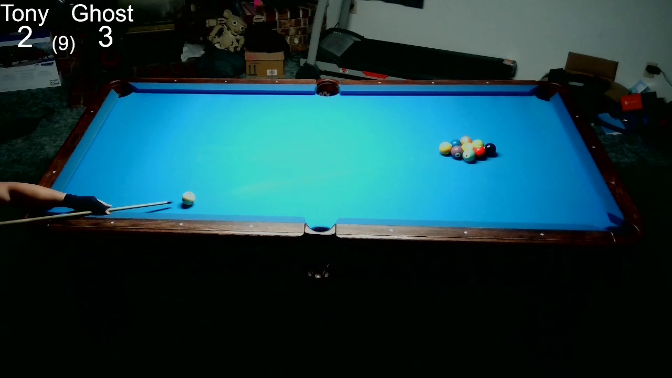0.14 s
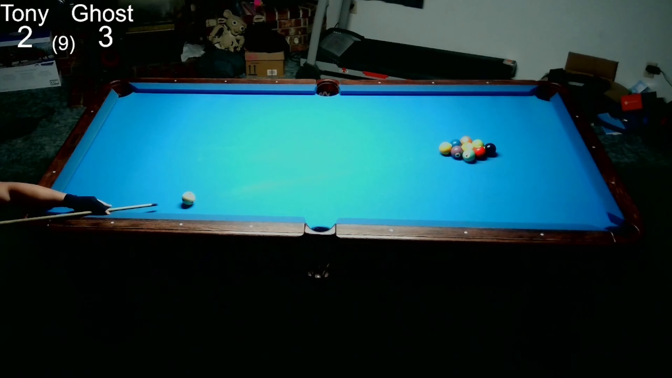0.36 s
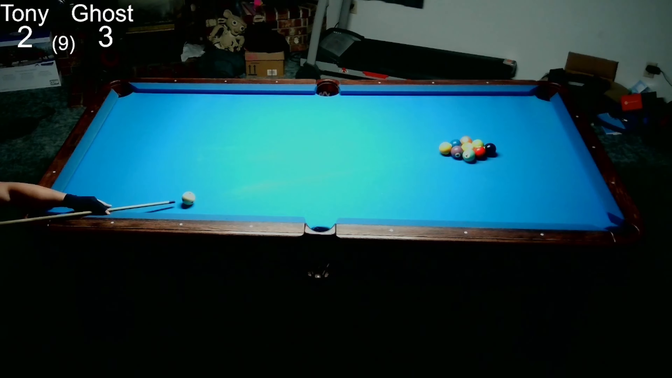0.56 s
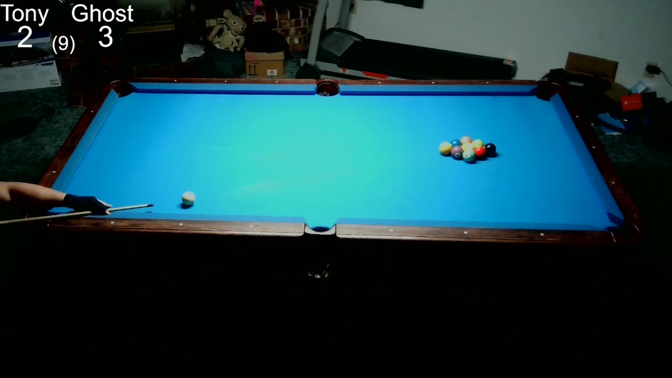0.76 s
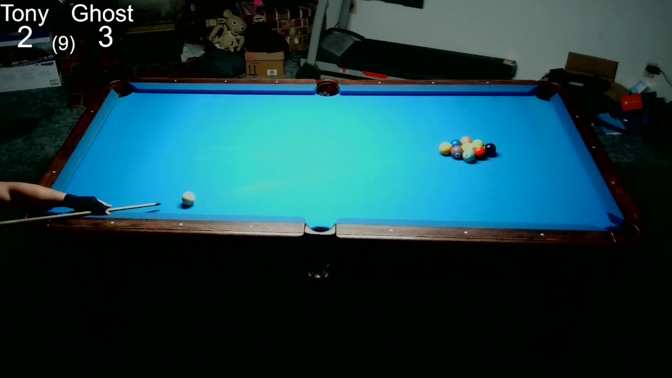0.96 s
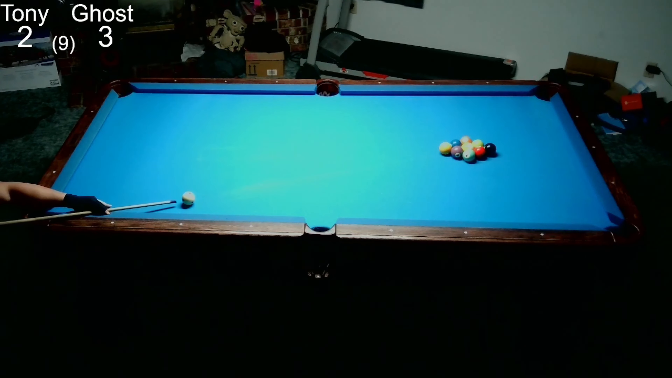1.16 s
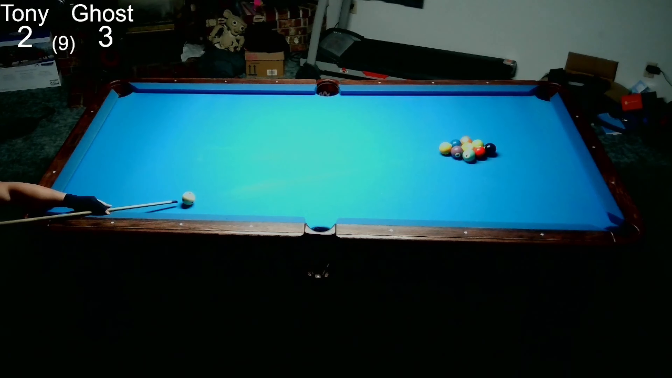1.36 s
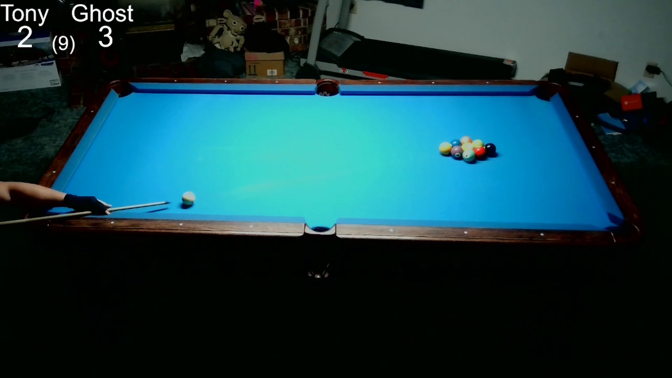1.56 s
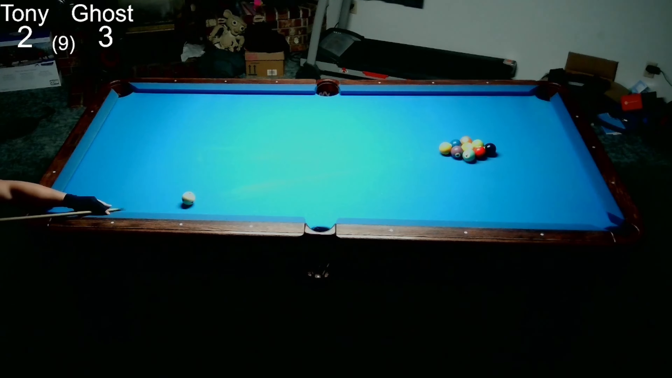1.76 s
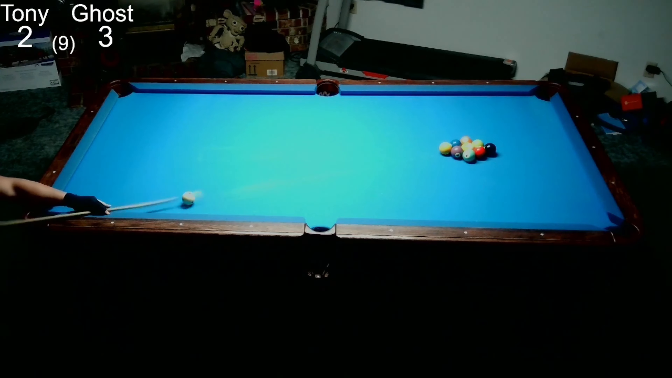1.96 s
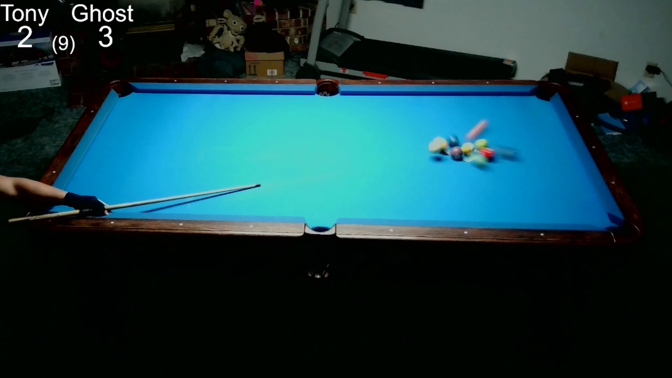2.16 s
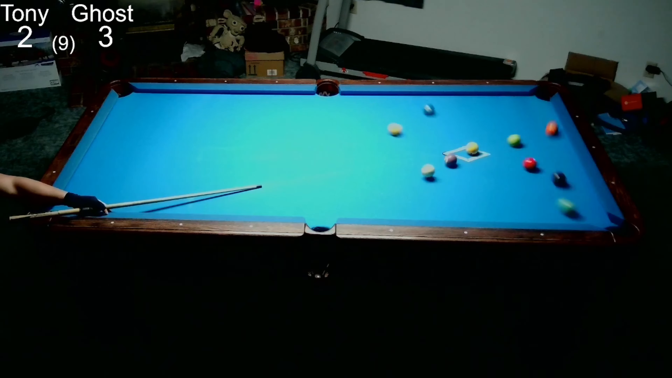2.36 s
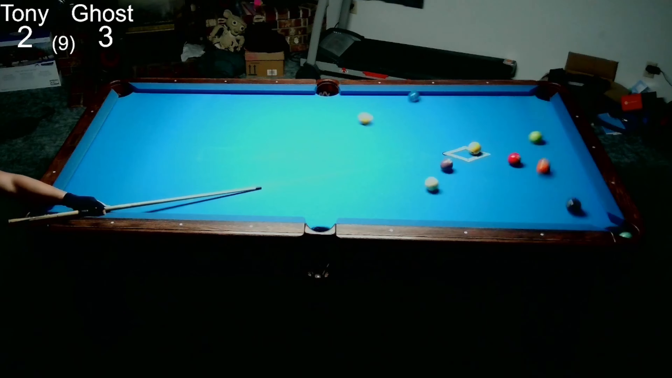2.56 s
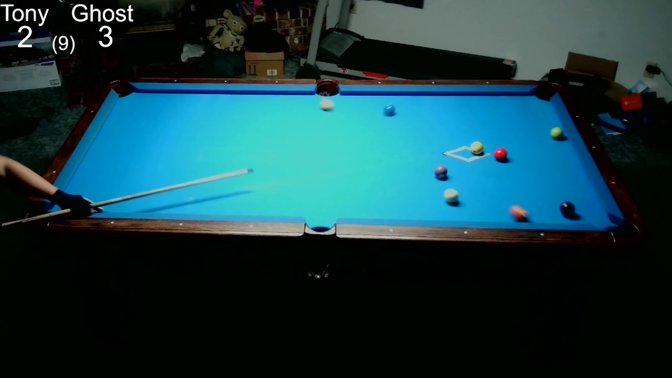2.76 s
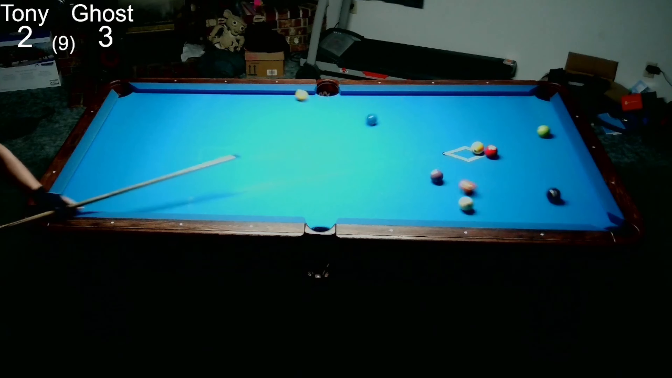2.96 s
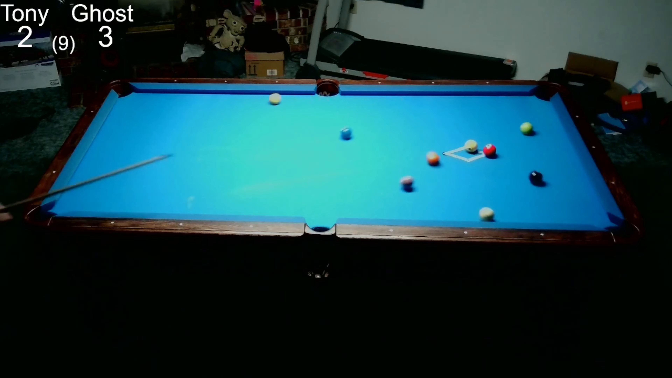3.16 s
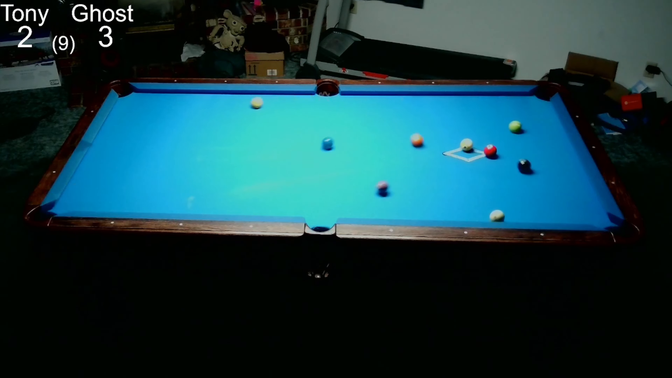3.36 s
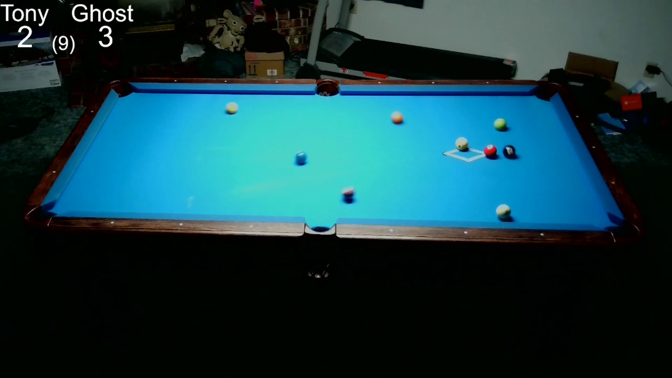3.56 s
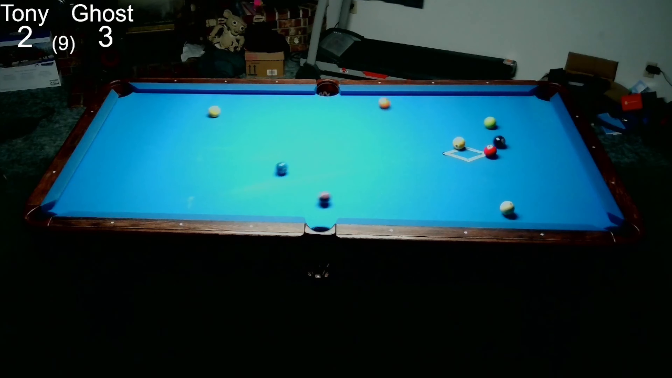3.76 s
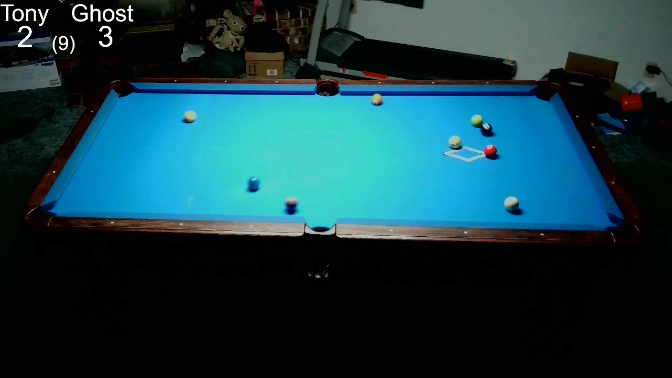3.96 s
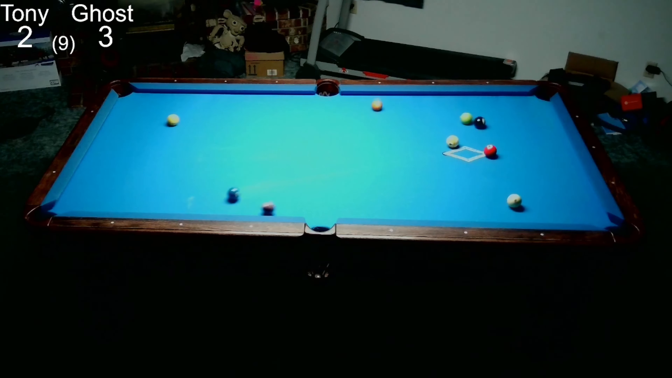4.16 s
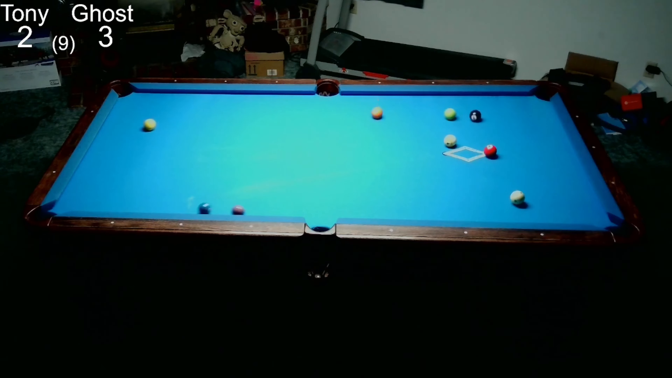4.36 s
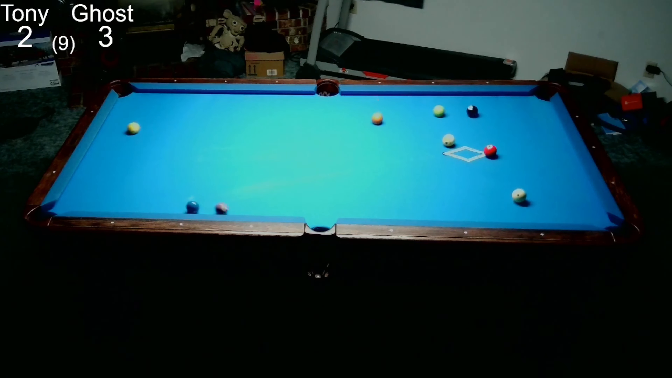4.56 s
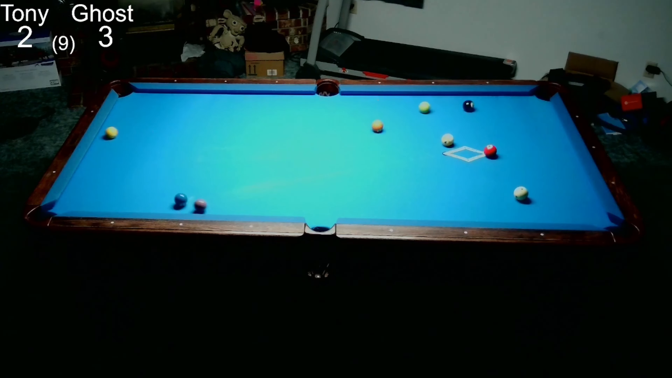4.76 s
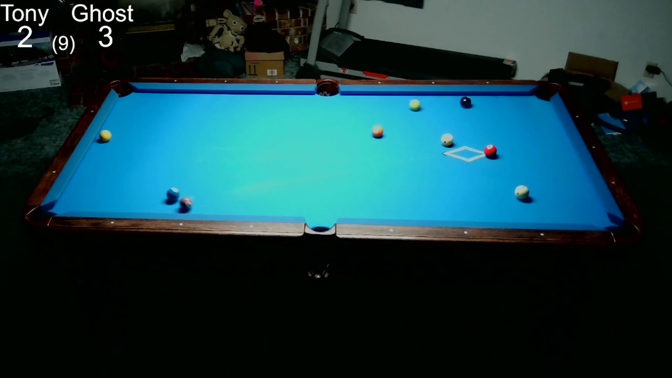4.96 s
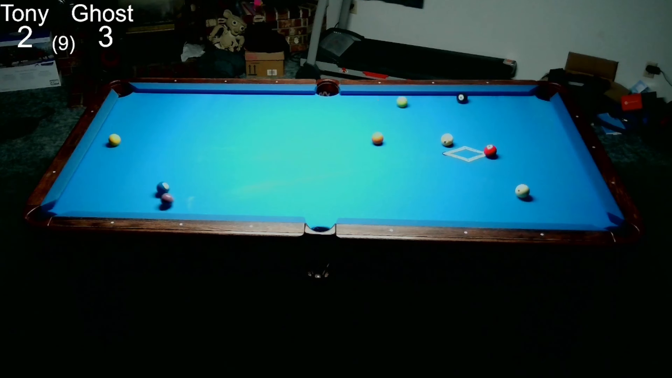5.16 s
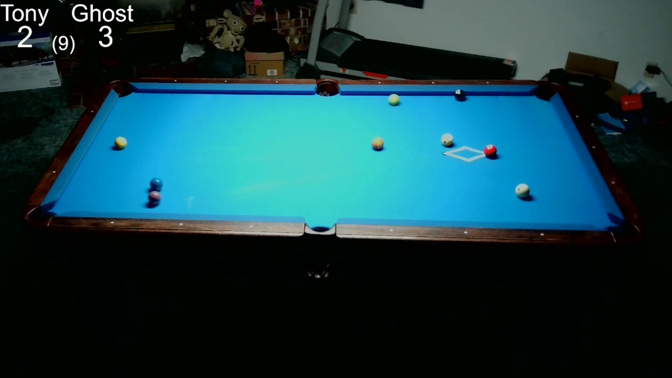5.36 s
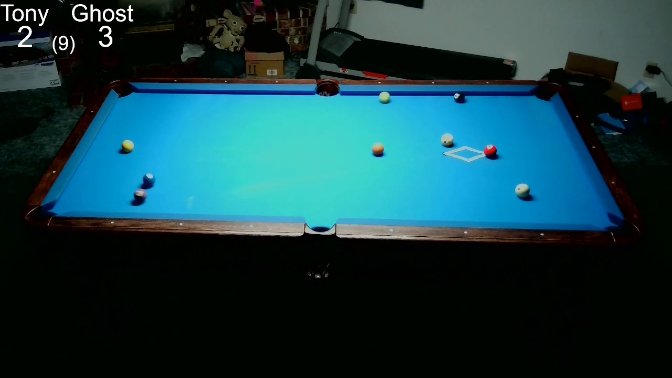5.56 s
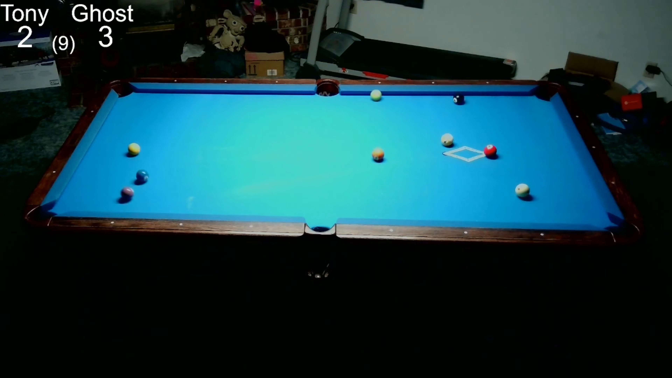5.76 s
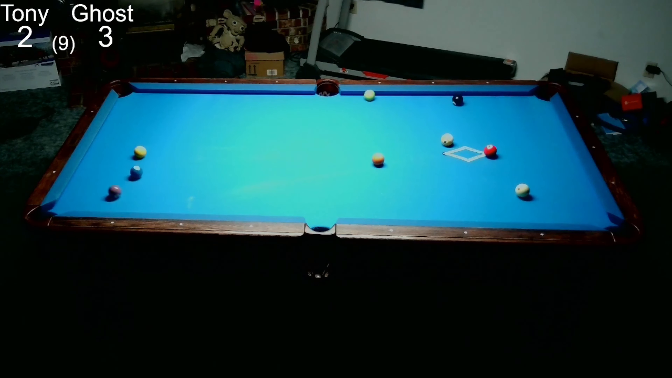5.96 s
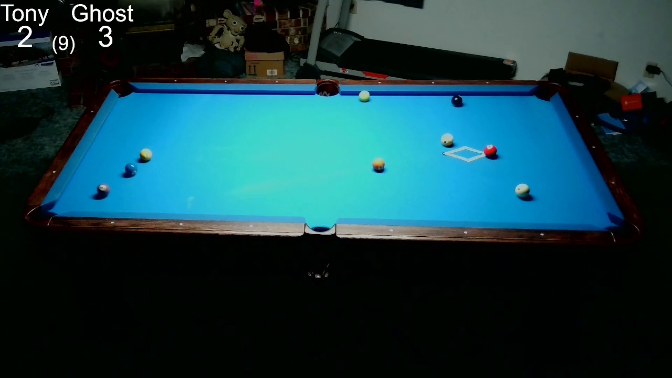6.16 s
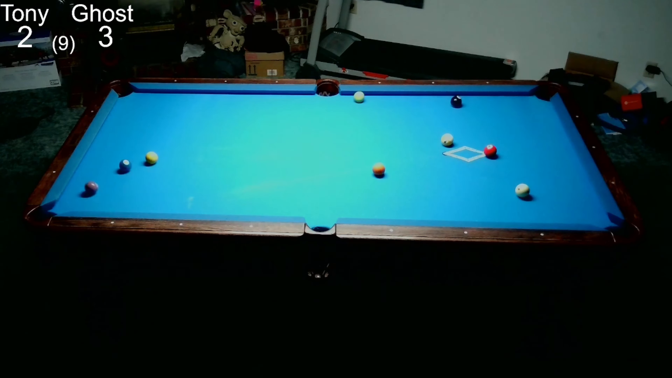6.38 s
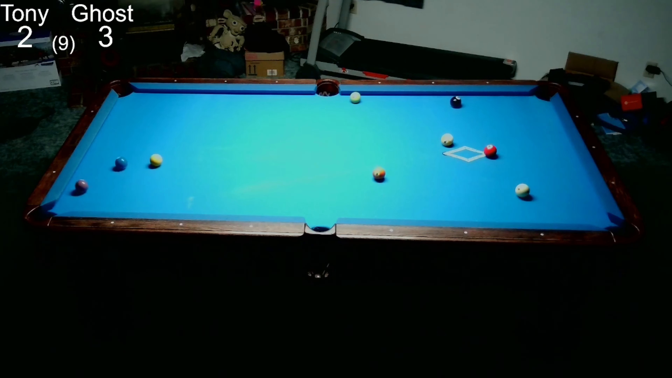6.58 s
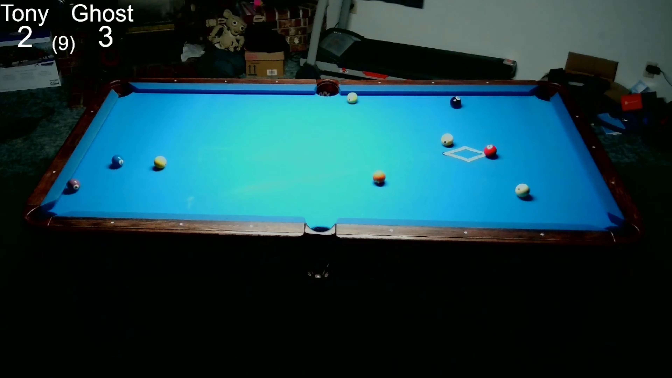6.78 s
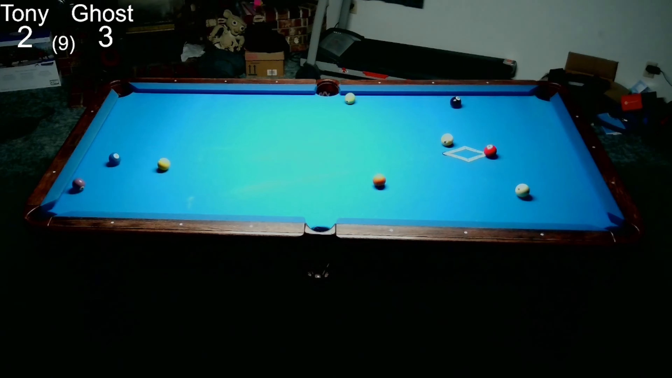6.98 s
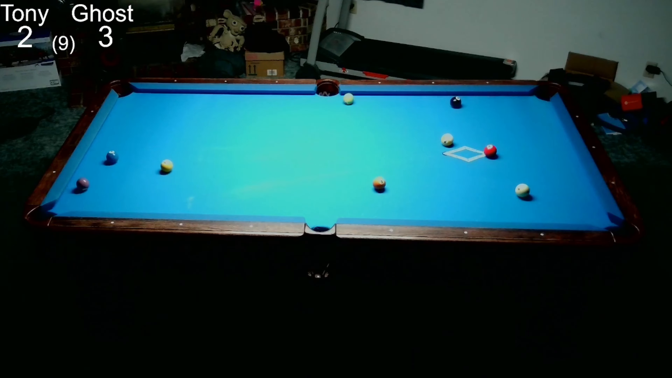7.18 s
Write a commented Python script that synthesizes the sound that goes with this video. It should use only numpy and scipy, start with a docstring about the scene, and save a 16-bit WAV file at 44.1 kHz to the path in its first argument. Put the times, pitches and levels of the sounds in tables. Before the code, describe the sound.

A steady low hum fills a quiet, small room until a pool break cuts in: a sharp cue strike, then a very loud crack of packed balls that briefly overloads the microphone. Dull cushion thumps and a few sharp ball clicks die away over faint rolling. Later come only scattered soft taps, a quiet knock of wood and some tiny clinks.

```python
"""Pool break in a small room.

Over mains hum and hiss, a cue cracks against the white ball, which bursts the rack hard enough
to overload the microphone. Balls thump into the rubber cushions, roll on the slate and click
together. Later come light taps, a wooden knock away from the balls and a few small clinks."""
import sys
import numpy as np
from scipy import signal
from scipy.fft import rfft, irfft
from scipy.io import wavfile

SR = 44100
rng = np.random.default_rng(int(sys.argv[2]) if len(sys.argv) > 2 else 0)


def dump(signal):
    """Clip the signal to [-1, 1] and save it as 16-bit WAV at the path in sys.argv[1]."""
    limited = np.clip(np.atleast_2d(signal).T, -1, 1)
    pcm = np.round(limited * 32767).astype(np.int16)
    wavfile.write(sys.argv[1], SR, pcm)


N = 318574
TIME_S = np.arange(N) / SR
BREAK_S = 2.0035


def from_db(db):
    """Decibels to gain."""
    return 10 ** (np.asarray(db) / 20)


def at_hz(points, hz):
    """Table lookup on a log-frequency axis."""
    points_hz, values = np.transpose(points)
    return np.interp(np.log(np.maximum(hz, 1)), np.log(points_hz), values)


def add(track, start_s, sound):
    """Mix sound into track at start_s."""
    start = round(start_s * SR)
    track[start:start + len(sound)] += sound[:N - start]


def butter(x, hz, kind, order=2):
    """Causal Butterworth filter."""
    sos = signal.butter(order, np.clip(hz, 10, .45 * SR), kind, fs=SR, output="sos")
    return signal.sosfilt(sos, x)


def noise(spectrum, size):
    """Coloured noise, rms 1."""
    gain = from_db(at_hz(spectrum, np.fft.rfftfreq(size, 1 / SR)))
    x = irfft(rfft(rng.standard_normal(size)) * gain, size)
    return x / x.std()


def fade(t60_s, size):
    """Exponential decay from 1."""
    return np.exp(-np.log(1000) * TIME_S[:size] / t60_s)


def ring(modes, size):
    """Damped sines of a struck body."""
    return sum(from_db(db) * fade(t60_s, size) * np.sin(2 * np.pi * hz * TIME_S[:size])
               for hz, db, t60_s in modes)


def rattle(low_hz, high_hz, t60_s, size):
    """Band-limited noise burst of a light contact."""
    burst = rng.standard_normal(size) * fade(t60_s, size)
    return 2 * butter(butter(burst, low_hz, "high"), high_hz, "low", order=4)


def background(mains_hz=60, hiss_db=-66.5, rumble_db=-67, rumble_hz=60):
    """Mains hum over faint room hiss and rumble."""
    # mains partials: harmonic number, rms level/dB
    harmonics = [(1, -48.5), (2, -74.5), (3, -85.5), (5, -87), (7, -83), (9, -85), (11, -83)]
    # room hiss: f/Hz, relative density/dB
    hiss_spectrum = [(100, -6), (160, -8.5), (260, -8), (400, -11.5), (700, -13), (1400, -17.5),
                     (3000, -21.5), (5200, -23.5), (8000, -28), (15500, -29)]
    hum = sum(np.sqrt(2) * from_db(db) * np.sin(2 * np.pi * (round(k) * mains_hz * TIME_S + rng.random()))
              for k, db in harmonics)
    rumble = butter(rng.standard_normal(N), rumble_hz, "low")
    return hum + from_db(hiss_db) * noise(hiss_spectrum, N) + from_db(rumble_db) * rumble / rumble.std()


def cue(crack_db=-10, crack_t60_s=.016, tip_hz=10000, ring_db=2, grip_t60_s=.12,
        gap_s=.0022, gap_growth=2.6, loss_db=3, contacts=3, size=16384):
    """The tip chatters; each contact cracks and rings the shaft, which the hand damps."""
    # blow and rebound: t/s, level/dB
    hits = [(1.8687, -2), (1.9239, -14)]
    # shaft and tip modes: f/Hz, level/dB, t60/s
    modes = [(970, -24.5, 0.015), (1152, -27, .04), (1686.5, -28.5, 0.022), (2546, -21.5, 0.04),
             (2910, -14.5, 0.044), (2896, -15.5, 0.081), (3550, -18, .025), (3570, -12.5, 0.014),
             (3750, -16, 0.061), (3754, -14.5, 0.019), (4380, -17, 0.044), (4580, -17.5, .06),
             (5567, -23.5, 0.068), (5618, -24, .10), (5550, -25, 0.055), (6100, -26, 0.018)]
    # tip crack: f/Hz, relative density/dB
    crack_spectrum = [(150, -15.5), (300, -11.5), (550, -7), (1000, -1), (2000, -5.5), (3600, 3),
                      (5800, -1), (7500, -10.5), (10500, -12), (12000, -22), (15500, -23.5)]
    out, grip = np.zeros(N), fade(grip_t60_s, size)
    for t_s, db in hits:
        for k in range(contacts):
            crack = butter(noise(crack_spectrum, size) * fade(crack_t60_s, size), tip_hz, "low", order=1)
            add(out, t_s, from_db(db + crack_db) * crack)
            for mode in modes:
                jitter_s = rng.random() / mode[0]
                partial = rng.choice([-1, 1]) * ring([mode], size) * grip
                add(out, t_s + jitter_s, from_db(db + ring_db) * partial)
            t_s += gap_s * gap_growth ** k
            db -= loss_db
    return butter(out, 110, "high")  # the stroke carries little bass


def cushions(full_db=-22, full_top_hz=1360, settle_s=.009, settle_db=-.5,
             rise_s=.004, rail_t60_s=.085, frame_db=-3.5, size=32768):
    """A ball hits rubber, then settles with a second bump; the rail dies fast, the frame rings on."""
    # balls on cushions and slate: t/s, level/dB
    thumps = [(1.8690, -32), (1.9620, -37), (2.0050, -35), (2.1290, -25.5), (2.2397, -22), (2.3090, -36.5),
              (2.3590, -30), (2.4220, -37.5), (2.5320, -40), (2.7070, -43)]
    # rubber and rail: f/Hz, relative density/dB
    rail_spectrum = [(50, -24.5), (120, -7.5), (220, -1.5), (350, -0.5), (550, -2), (800, -3.5),
                     (1200, -1.5), (3000, -2)]
    # table frame modes: f/Hz, level/dB, t60/s
    frame_modes = [(141, -30.5, .4), (205.73, -22.5, 2.2), (274, -21.5, 0.299)]
    out = np.zeros(N)
    frame = from_db(frame_db) * ring(frame_modes, size)
    attack = 1 - np.exp(-TIME_S[:size] / rise_s)
    for t_s, db in thumps:
        drop_db = full_db - db  # slower balls sound duller and settle later
        top_hz = full_top_hz / 2 ** (drop_db / 42)
        wait_s = settle_s * 2 ** (drop_db / 12)
        for start_s, bump_db in ((t_s, db), (t_s + wait_s, db + settle_db)):
            rail = butter(noise(rail_spectrum, size), top_hz, "low", order=4)
            thump = rail / rail.std() * fade(rail_t60_s, size) + frame
            add(out, start_s, from_db(bump_db) * thump * attack)
    return out


def clack(contact_ms, radiate_hz=1400, snap_db=-45, fizz_db=-40, size=1024):
    """Two balls collide and radiate the slope of the contact force, plus faint snap and fizz."""
    phase = np.pi * np.minimum(TIME_S[:size] * 1000 / contact_ms, 1)
    force = np.sin(phase).clip(0) ** 1.5
    pulse = butter(np.diff(force, prepend=0), radiate_hz, "high", order=1)
    pulse = butter(pulse, 670, "high")  # a small sphere radiates long waves poorly
    pulse = butter(pulse, 1300 / contact_ms, "low", order=4)  # longer contact, duller sound
    snap = from_db(snap_db) * rng.standard_normal(size) * fade(.003, size)
    fizz = from_db(fizz_db) * rattle(low_hz=13500, high_hz=15000, t60_s=.004, size=size)
    return pulse / np.abs(pulse).max() + snap + fizz


def front_row(first_db=12, loss_db=1, first_ms=.33, lengthening=1.03, contacts=4):
    """The first balls pass the blow on, back to back, each contact weaker and longer."""
    out, t_s = np.zeros(N), BREAK_S
    for k in range(contacts):
        contact_ms = first_ms * lengthening ** k
        add(out, t_s, from_db(first_db - k * loss_db) * clack(contact_ms))
        t_s += contact_ms / 1000
    return out


def rack(chain_db=3.5, fall_db=8, spread_s=.008, hard_ms=.29, soft_ms=.41,
         clatter_db=-1, clatter_t60_s=.02, contacts=10, size=8192):
    """The blow weakens through the packed balls; the smallest contacts merge into clatter."""
    # rack clatter: f/Hz, relative density/dB
    clatter_spectrum = [(80, -40), (250, -27), (700, -17.5), (1150, 3), (1500, -6), (2200, -3), (3000, 4.5),
                        (4200, -9), (5600, -19.5), (7000, -29.5), (9000, -43), (15000, -50.5)]
    out = np.zeros(N)
    for depth in (np.arange(contacts) + rng.random(contacts)) / contacts:
        contact = clack(hard_ms + depth * (soft_ms - hard_ms)) * rng.choice([-1, 1])
        add(out, BREAK_S + depth * spread_s, from_db(chain_db - depth * fall_db) * contact)
    add(out, BREAK_S, from_db(clatter_db) * noise(clatter_spectrum, size) * fade(clatter_t60_s, size))
    return out


def rolling(slate_hz=262, width_hz=45, level_db=-73, fall_db_per_s=.02):
    """From the break on, rolling balls excite one low slate band at near-constant level."""
    band_hz = [slate_hz - width_hz / 2, slate_hz + width_hz / 2]
    murmur = butter(rng.standard_normal(N), band_hz, "band", order=1)
    age_s = TIME_S - BREAK_S
    return (age_s > 0) * from_db(level_db - fall_db_per_s * age_s) * murmur / murmur.std()


def collisions():
    """Spreading balls click together."""
    # ball on ball: t/s, level/dB, contact time/ms
    hits = [(2.2155, -9.5, 0.37), (2.8521, -33.5, 0.456), (2.9022, -19, 0.4), (3.9640, -40, 0.477)]
    out = np.zeros(N)
    for t_s, db, contact_ms in hits:
        add(out, t_s, from_db(db) * clack(contact_ms))
    return out


def taps(width_octaves=1.33, size=8192):
    """Light contacts: noise bursts, each around its own pitch."""
    # taps: t/s, level/dB, centre f/Hz, t60/s
    hits = [(2.418, -43, 2880, 0.04), (2.4634, -42, 2460, 0.025), (2.6826, -48.5, 2257, 0.089),
            (2.7073, -52.5, 2710, 0.172), (4.2307, -42.5, 3100, .007), (5.475, -55.5, 2900, 0.056),
            (5.8180, -52.5, 4300, 0.073), (5.979, -56.5, 2600, 0.0405), (6.6050, -53.5, 1295, 0.166),
            (6.8095, -50.5, 1150, .04), (6.889, -53.5, 1300, .044)]
    out, edge_ratio = np.zeros(N), 2 ** (width_octaves / 2)
    for t_s, db, hz, t60_s in hits:
        add(out, t_s, from_db(db) * rattle(hz / edge_ratio, hz * edge_ratio, t60_s, size))
    return out


def knocks(crack_db=-1, size=16384):
    """Something wooden is set down, bounces and rings; the floor booms."""
    # knock and bounces: t/s, level/dB
    hits = [(6.0912, -42), (6.0938, -47.5), (6.137, -57)]
    # wood modes: f/Hz, level/dB, t60/s
    modes = [(141, 2, 0.092), (181, 2.5, 0.074), (250, -5, 0.04), (386, -1, 0.02), (604, -7.5, .015),
             (1090, -2, 0.015), (2680, -5, 0.0162), (3070, 1, 0.018), (3236, -7, 0.0156), (4400, -15, .02)]
    # floor boom: t/s, level/dB, f/Hz, t60/s
    booms = [(6.129, -38.5, 70.5, 0.14)]
    out = np.zeros(N)
    for t_s, db in hits:
        crack = from_db(crack_db) * rattle(low_hz=900, high_hz=5200, t60_s=.029, size=size)
        add(out, t_s, from_db(db) * (ring(modes, size) + crack))
    for t_s, db, hz, t60_s in booms:
        add(out, t_s, ring([(hz, db, t60_s)], size))
    return out


def clinks(tick_db=-5, surface_db=-2, surface_delay_s=.0029, size=8192):
    """A small hard object ticks and rings; the hardest hit also sounds the surface below."""
    # contacts: t/s, level/dB, low-pass f/Hz
    hits = [(6.6315, -52, 12000), (6.6399, -42.5, 11200), (6.9314, -51, 3900), (6.9598, -52.5, 3670)]
    # object modes: f/Hz, level/dB, t60/s
    modes = [(4000, -2, 0.0083), (4680, -2.5, .012), (5116, -9, 0.019), (5200, -6.5, 0.026),
             (5520, -7, 0.02), (5904, -23.5, .015)]
    out = np.zeros(N)
    for t_s, db, top_hz in hits:
        tick = from_db(tick_db) * rattle(low_hz=2500, high_hz=top_hz, t60_s=.0055, size=size)
        ringing = butter(ring(modes, size), top_hz, "low", order=4)
        add(out, t_s, from_db(db) * (tick + ringing))
    hardest_s, hardest_db, _ = max(hits, key=lambda hit: hit[1])
    surface = rattle(low_hz=280, high_hz=3600, t60_s=.02, size=size)
    add(out, hardest_s + surface_delay_s, from_db(hardest_db + surface_db) * surface)
    return out


def room(x, tail_db, echo_db, build_s=.0076, size=40000):
    """Direct sound, discrete echoes and a diffuse tail whose treble dies first."""
    # nearby surfaces and walls: delay/s, level/dB
    echoes = [(.00248, -7), (.00357, -9.5), (.0054, -11), (.0080, -15), (0.0234, -14.5), (0.0259, -13),
              (.0312, -15.5)]
    # tail decay: f/Hz, t60/s
    decay = [(150, .48), (500, .40), (1200, .34), (2400, .30), (5500, .32), (12000, .26)]
    # tail colour: f/Hz, level/dB
    colour = [(150, -1), (600, 2), (1200, 1.5), (2500, 3.5), (3500, -2), (5200, 1), (8000, -0.5),
              (14000, 1)]
    hz = np.fft.rfftfreq(size, 1 / SR)
    spectrum = rfft(rng.standard_normal(size)) * from_db(at_hz(colour, hz))
    centres_hz, t60s_s = np.transpose(decay)
    bands = [at_hz(np.c_[centres_hz, weights], hz) for weights in np.eye(len(decay))]
    tail = sum(irfft(spectrum * band, size) * fade(t60_s, size) for band, t60_s in zip(bands, t60s_s))
    tail *= 1 - np.exp(-TIME_S[:size] / build_s)
    response = from_db(tail_db) * tail / np.linalg.norm(tail)
    response[0] = 1
    for delay_s, db in echoes:
        response[round(delay_s * SR)] += from_db(db + echo_db)
    return signal.fftconvolve(x, response)[:N]


def scene():
    """Mono mix: one room, echo and tail levels set per source."""
    burst = room(front_row(), tail_db=-12.5, echo_db=-8.5) + room(rack(), tail_db=-5.5, echo_db=-5.5)
    clicks = room(collisions(), tail_db=-3, echo_db=2.5)
    table = room(cushions(), tail_db=-4.5, echo_db=-8.5) + rolling()
    stroke = room(cue(), tail_db=-4, echo_db=-3.5)
    light_hits = room(taps() + clinks(), tail_db=-5, echo_db=-8)
    wood = room(knocks(), tail_db=-7, echo_db=-9)
    return (burst + clicks + table + stroke + light_hits + wood + background())[None]


def record(dry, ceiling=.93, cutoff_hz=15900):
    """Overload flattens the loudest peaks; a steep low-pass follows."""
    clipped = dry / (1 + (dry / ceiling) ** 8) ** (1 / 8)
    return signal.sosfilt(signal.ellip(12, .1, 100, cutoff_hz, fs=SR, output="sos"), clipped)


dry = scene()
out = record(dry)
dump(out)
```